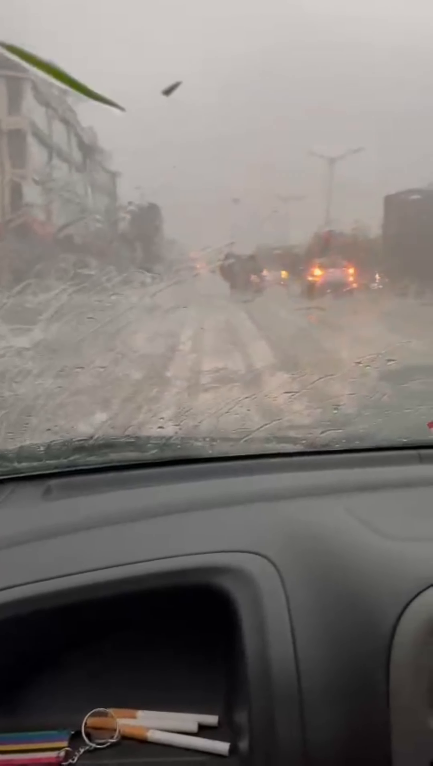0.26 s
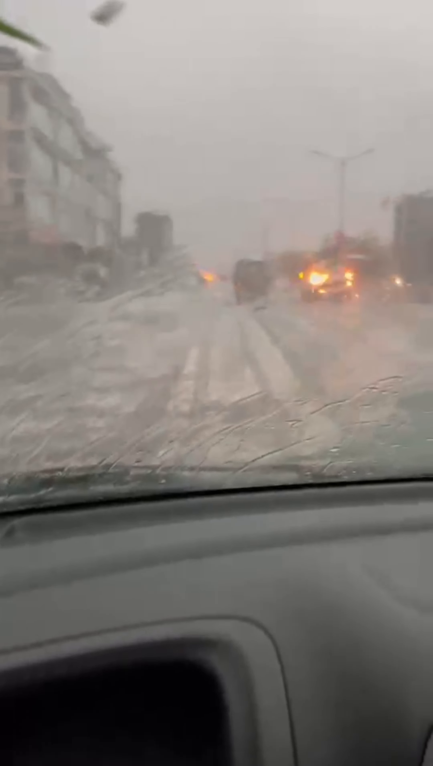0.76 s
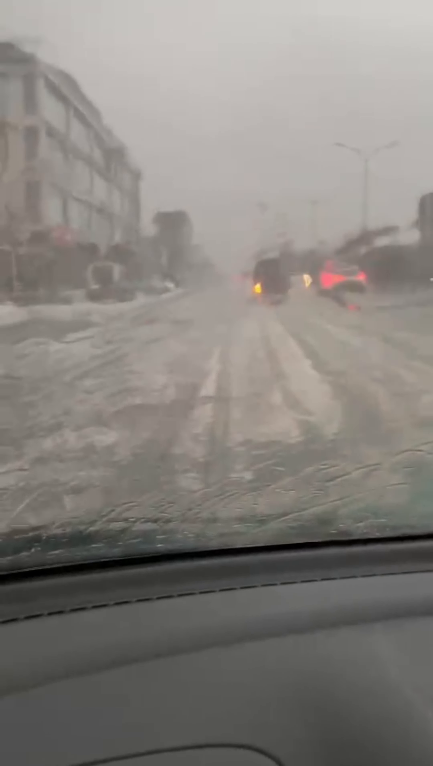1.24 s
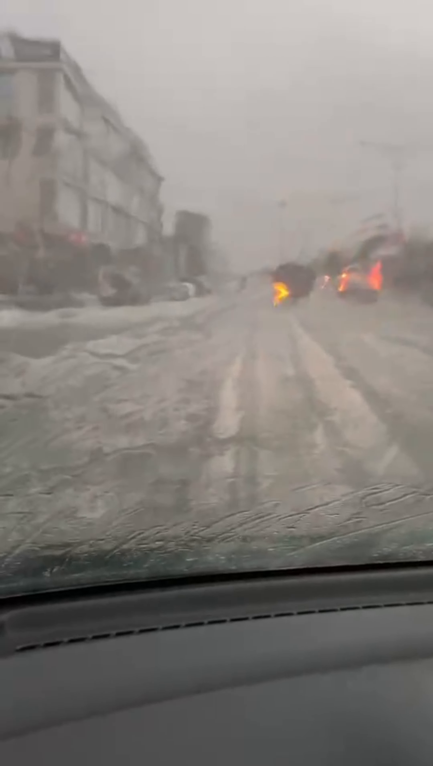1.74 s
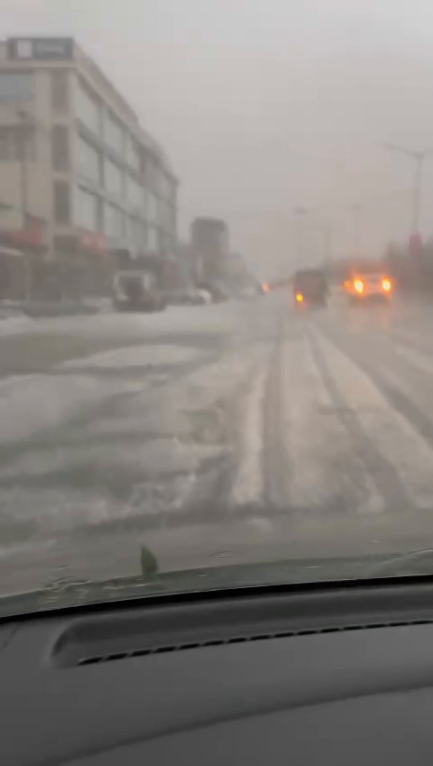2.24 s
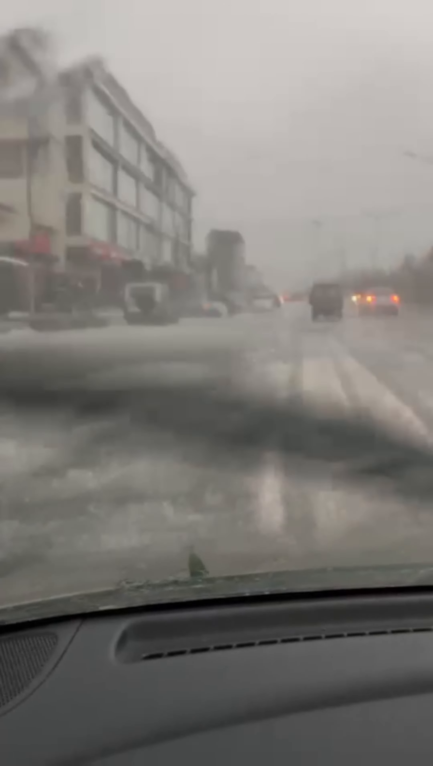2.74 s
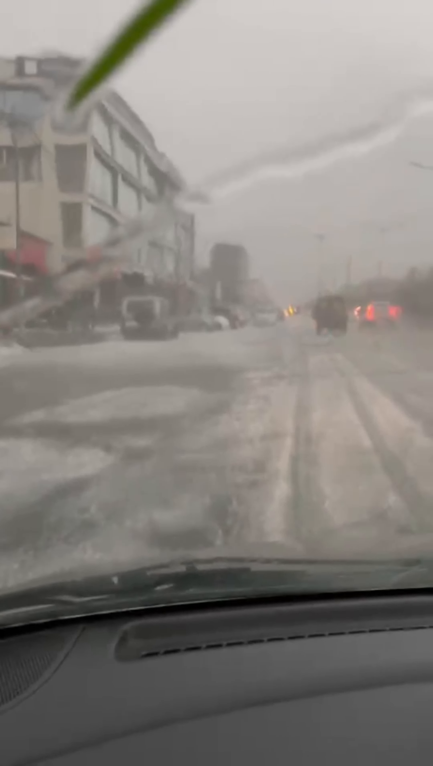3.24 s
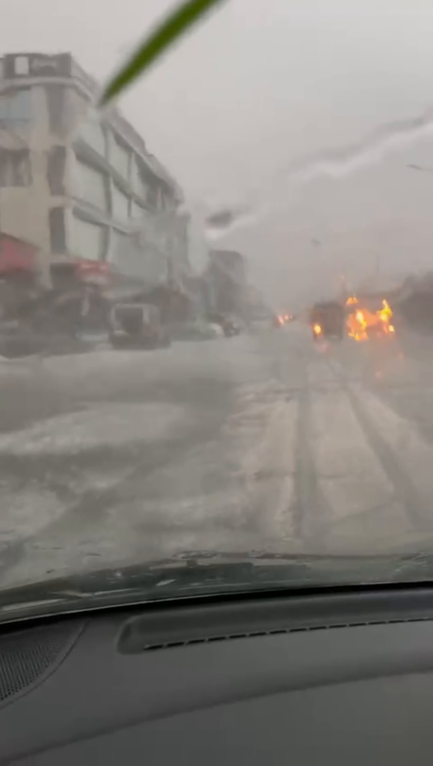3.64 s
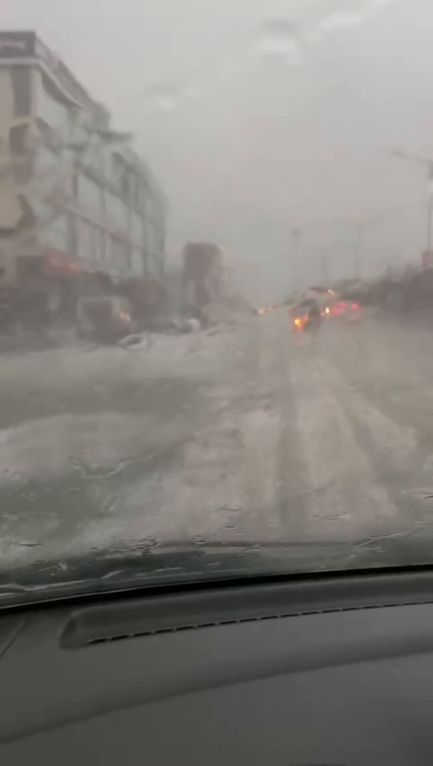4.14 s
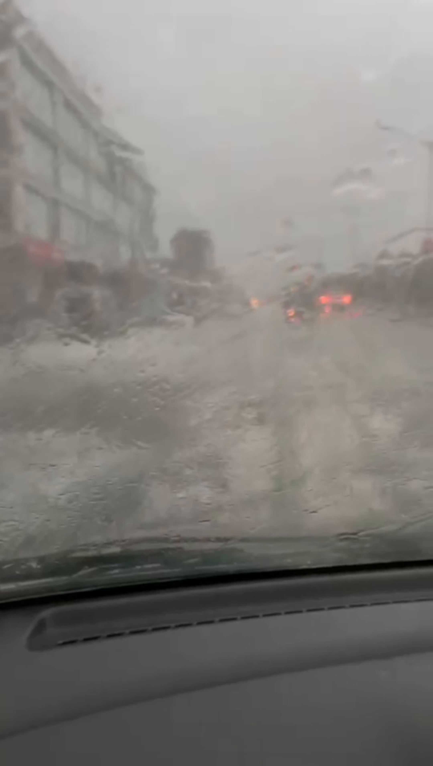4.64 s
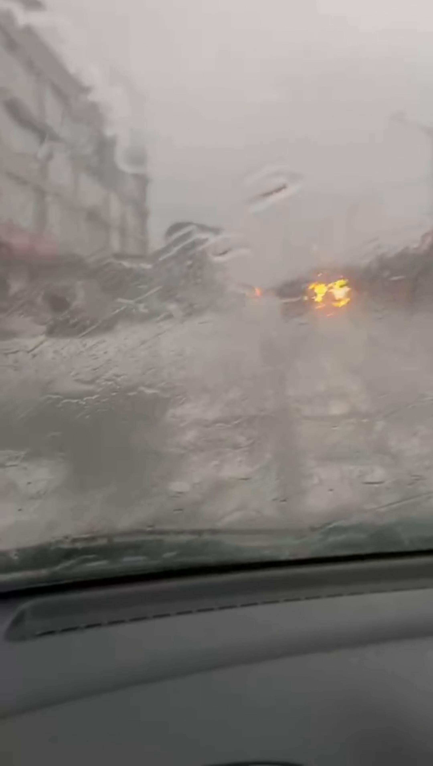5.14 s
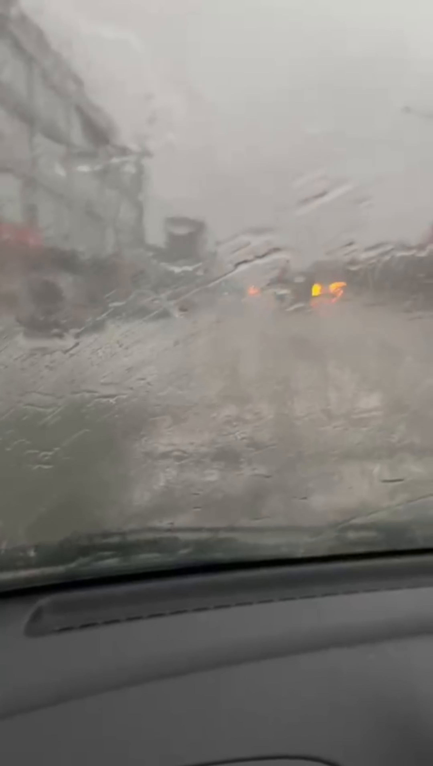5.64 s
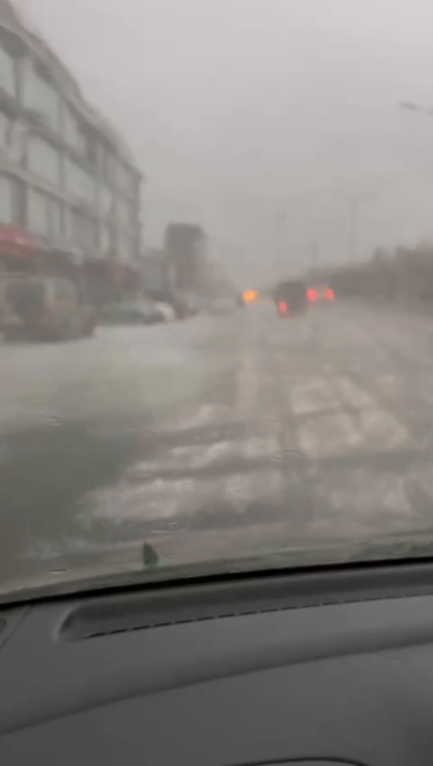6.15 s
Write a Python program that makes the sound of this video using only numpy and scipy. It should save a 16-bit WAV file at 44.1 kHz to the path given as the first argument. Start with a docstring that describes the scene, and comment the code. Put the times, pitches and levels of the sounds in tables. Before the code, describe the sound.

Dense hail rattles and hisses against glass and metal, heard from a car cabin full of low, heaving bass, thuds and hard snaps.

```python
"""Hail on a car, heard from the cabin

Hail and heavy rain drum on the roof and windscreen of a slowly rolling car.
Noise in the body's lowest modes booms, with short low swells, thuds and one low hum.
Noise shaped by random small blows makes a rattling hiss; timed larger stones crack, tick and snap out of it.
The bass is central; treble bands alternate between centred and opposed in left and right."""
import sys
import numpy as np
from scipy import signal
from scipy.fft import rfft, irfft, next_fast_len
from scipy.io import wavfile
from scipy.ndimage import uniform_filter1d, map_coordinates

SR = 44100
rng = np.random.default_rng(int(sys.argv[2]) if len(sys.argv) > 2 else 0)


def generate_wav(signal):
    """Clip the signal to [-1, 1] and save it as 16-bit WAV at the path in sys.argv[1]."""
    frames = np.transpose(np.atleast_2d(signal))
    scaled = np.clip(frames, -1, 1) * 32767
    pcm = np.round(scaled).astype(np.int16)
    wavfile.write(sys.argv[1], SR, pcm)


N = 281799


def amp(db):
    """Amplitude factor of a level in dB; amp(2 * db) is the power factor."""
    return 10 ** (np.asarray(db) / 20)


def unit(x):
    """Scale to an RMS of 1."""
    return x / np.sqrt(np.mean(x ** 2) + 1e-20)


def along(points, hz):
    """Interpolate (f/Hz, value) points on a log frequency axis."""
    f, v = np.transpose(points)
    return np.interp(np.log(hz + 1), np.log(f + 1), v)


def curves(rows):
    """One value per sample for each column after the time."""
    s, *cols = np.transpose(rows)
    t = np.arange(N) / SR
    return [np.interp(t, s, c) for c in cols]


def filtered(x, response):
    """Multiply the spectrum of x by a response of frequency in Hz."""
    m = next_fast_len(N + SR // 2)
    hz = np.fft.rfftfreq(m, 1 / SR)
    return irfft(rfft(x, m) * response(hz), m)[..., :N]


def ringing(modes, even):
    """Noise in resonances of alternating sign; even (0-1) irons out its chance swells."""
    def shell(f):
        total = 0
        for k, (centre_hz, width_hz, db) in enumerate(modes):
            damping = 1j * f * width_hz
            total = total + (-1) ** k * amp(db) * damping / (centre_hz ** 2 - f ** 2 + damping)
        return total

    x = unit(filtered(rng.standard_normal(N), shell))
    envelope = np.abs(signal.hilbert(x, next_fast_len(N))[:N])
    swell = uniform_filter1d(envelope, size=700)
    return unit(x / (swell + 0.79) ** even)


def wobble(per_s):
    """Smooth random curve: per_s random points a second, spline between."""
    return map_coordinates(rng.standard_normal(200), [np.arange(N) * per_s / SR])


def swells(rows, half_s):
    """Short tones under Gaussian envelopes (1/e half-width half_s), each at its own pitch and random phase."""
    out = np.zeros(N + SR)
    t = np.arange(-SR // 8, SR // 8) / SR
    for (s, hz, db), turn in zip(rows, rng.random(len(rows))):
        tone = np.sin(2 * np.pi * (hz * t + turn))
        out[round(s * SR):][:len(t)] += amp(db) * np.exp(-(t / half_s) ** 2) * tone
    return out[SR // 8:][:N]


def hum():
    """One low tone that swells and fades under a Gaussian envelope."""
    centre_s, pitch_hz, peak_db, half_s = 1.3, 280, -27, 0.17
    t = np.arange(N) / SR
    return amp(peak_db) * np.exp(-((t - centre_s) / half_s) ** 2) * np.sin(2 * np.pi * pitch_hz * t)


def boom():
    """The shell shakes as a whole; seats and trim swallow all above its modes, vents leak all below."""
    # mode-group levels before the cabin filter: t/s, drum level/dB, upper level/dB
    levels = [(0.0, -17.5, -20.5), (0.91, -22, -20), (1.69, -19, -17), (2.88, -17, -19), (3.22, -28.5, -19),
              (3.98, -14, -16), (4.4, -16, -19.5), (4.79, -18.5, -16.5), (5.21, -14.5, -23),
              (5.39, -18.5, -15.5), (6.0, -15, -21), (6.39, -22, -12.5)]
    # cabin and floor pan modes: f/Hz, width/Hz, relative level/dB
    sway_modes = [(45.6, 21.3, 0)]
    drum_modes = [(66.25, 9.9, 3), (80.7, 9.5, -9.5)]
    upper_modes = [(96.1, 14.9, -1.5), (122.2, 21, -0.5), (156, 46.6, -6.5), (205, 32, -10),
                   (278.8, 6.4, -13.5), (346, 20, -20.5), (391.4, 38, -21)]
    # short low swells in the boom: t/s, f/Hz, peak before cabin filter/dB
    low_swells = [(0.039, 69.6, -10), (0.828, 72.6, -6), (1.245, 72, -12), (1.406, 80, -9.5),
                  (1.706, 90, -8.5), (1.788, 90, -11), (1.887, 68, -4), (2.006, 75, -10), (2.123, 64, -17),
                  (2.236, 72, -5.7), (2.314, 95.5, -14), (2.492, 77.4, -9.5), (2.567, 100.5, -7),
                  (2.72, 92, -11.5), (3.155, 88, -10.5), (3.308, 66, -7), (3.412, 103, -11),
                  (3.58, 89, -15), (3.66, 71.5, -11), (3.881, 80, -28), (3.951, 102, -17),
                  (4.075, 77.5, -20), (4.319, 90.5, -7.5), (4.621, 68, -7.5), (4.988, 74.5, -8.5),
                  (5.102, 82, -10.5), (5.23, 82.3, -6), (5.506, 109, -9), (5.567, 94, -15),
                  (5.673, 87.5, -11.5), (5.795, 73, -5.5), (6.033, 76.4, -10.5), (6.219, 81, -6.5),
                  (6.365, 81, -13)]
    # dull thuds in the roof panel: t/s, f/Hz, peak before cabin filter/dB
    thuds = [(0.038, 192, -15.5), (0.16, 203, -15.5), (0.237, 200, -15.5), (1.16, 250, -19),
             (1.405, 266, -21), (1.582, 209, -14), (1.724, 210, -16.5), (1.848, 236, -20.5),
             (2.001, 275, -17.5), (2.216, 220, -17.5), (2.396, 229, -20), (2.512, 201, -14),
             (2.719, 200, -13), (2.999, 198, -15), (3.454, 204, -13), (3.622, 217, -20), (3.954, 219, -16),
             (4.033, 223, -16), (4.205, 238, -19.5), (4.439, 224, -19.5), (4.612, 224, -15.5),
             (4.693, 309, -15.5), (4.81, 220, -18), (5.35, 207, -19), (5.847, 219, -19), (6.188, 214, -14)]
    sway_db, drift_db, drift_per_s = -19.5, 0.34, 9
    swell_half_s, thud_half_s = 0.021, 0.012

    def drifting(db):
        return amp(db + drift_db * wobble(drift_per_s))

    def cabin(hz):
        trim = 1 / (1 + (hz / 450) ** 4)
        vents = hz ** 4 / (hz ** 4 + 24 ** 4)
        return trim * vents

    drum_db, upper_db = curves(levels)
    sway = drifting(sway_db) * ringing(sway_modes, even=1.0)
    drum = drifting(drum_db) * ringing(drum_modes, even=0.82)
    upper = drifting(upper_db) * ringing(upper_modes, even=0.24)
    bumps = swells(low_swells, swell_half_s) + swells(thuds, thud_half_s)
    return filtered(sway + drum + upper + hum() + bumps, cabin)


def small_stones(per_s, spread_db, most_db):
    """Energies of blows at random moments, sizes capped: rows for roof, glass body, glass surface."""
    draw = rng.random((6000, 4))
    at = np.cumsum(-np.log(draw[:, 0])) * SR / per_s
    keep = at < N
    size_db = np.minimum(-spread_db * np.log(draw[keep, 1:]), most_db)
    # big stones are mostly big everywhere: roof and surface follow the glass body
    size_db[:, ::2] = (size_db[:, ::2] + 3 * size_db[:, 1:2]) / 4
    return [np.bincount(at[keep].astype(int), amp(2 * db), N) for db in size_db.T]


def struck(blows, crack_s, tail_s, tail_db, rise_s=0.0029):
    """Power of blows: a brief round tap, a crack with a short soft rise, a dying tail (t60s)."""
    tap_db = -15
    t = np.arange(SR // 5) / SR
    tap = amp(2 * tap_db) * np.exp(-(2 * t / rise_s - 2) ** 2)
    rise = 1 - np.exp(-(t / rise_s) ** 2)
    decay = amp(-120 * t / crack_s) + amp(2 * tail_db - 120 * t / tail_s)
    return np.abs(signal.fftconvolve(blows, tap + rise * decay)[:N])


def mottled(patchy_db):
    """Two noises whose shared colour varies in random patches of RMS depth patchy_db."""
    z = signal.stft(rng.standard_normal((2, N)), nperseg=256)[2]
    field = rng.standard_normal(z.shape[1:])
    field = uniform_filter1d(field, size=4, axis=0)  # over frequency
    field = uniform_filter1d(field, size=6, axis=1)  # over time
    return unit(signal.istft(z * amp(patchy_db * unit(field)), nperseg=256)[1][:, :N])


def stereo(pair, colour):
    """Colour two noises and mix them as mid and side to a left-right correlation by frequency."""
    # left-right correlation by frequency: f/Hz, correlation (1 = centred, -1 = opposed)
    correlation = [(150, .9995), (280, .98), (400, .8), (800, .3), (1800, .55), (2600, -.78), (3200, -.68),
                   (4000, .08), (5200, .15), (5650, -.98), (5900, -.995), (6700, -.992), (7100, .96),
                   (8800, .975), (9400, -.997), (10900, -.997), (11500, .96)]

    def split(hz):
        turn = np.arccos(along(correlation, hz)) / 2
        return amp(along(colour, hz)) * [np.cos(turn), np.sin(turn)]

    mid, side = filtered(pair, split)
    colour_power = amp(2 * along(colour, np.linspace(0, SR / 2, num=4096)))
    return np.array([mid + side, mid - side]) / np.sqrt(np.mean(colour_power))


def pelted(colour, level_db, small, share, large, crack_s, tail_s, tail_db):
    """Coloured noise whose power is a blur of rain, a share of small stones and the large ones."""
    # small stones tap more briefly and sharply, with a weaker tail
    patter = struck(small, 0.4 * crack_s, tail_s, tail_db - 3, rise_s=0.001)
    storm = amp(2 * level_db) * (1 - share + share * patter / patter.mean())
    power = storm + struck(large, crack_s, tail_s, tail_db)
    return stereo(np.sqrt(power) * mottled(patchy_db=2), colour)


def dips():
    """Level in dB of brief dips in the bright rattle, with soft edges."""
    # dips: start/s, end/s, depth/dB
    dip_rows = [(0.391, 0.438, -9), (0.551, 0.562, -11), (0.65, 0.673, -6), (0.922, 0.945, -4),
                (1.772, 1.8, -4.5), (1.922, 1.94, -6), (2.4, 2.435, -2.5), (2.595, 2.612, -6),
                (3.704, 3.777, -3.5), (3.878, 3.919, -9.5), (4.01, 4.063, -5), (5.375, 5.404, -5)]
    fall_s, return_s = 0.0071, 0.003
    t = np.arange(N) / SR
    return sum(db / 2 * (np.tanh((t - a) / fall_s) - np.tanh((t - b) / return_s)) for a, b, db in dip_rows)


def snaps(blows):
    """Short bright noise snaps, the same in left and right."""
    # snap colour: f/Hz, gain/dB
    snap_colour = [(1500, -27), (3000, -1), (6200, 3), (9000, -2), (10500, -4), (12000, -12), (13200, -45)]
    power = struck(blows, crack_s=0.003, tail_s=0.03, tail_db=-15, rise_s=0.0014)
    return filtered(np.sqrt(power) * rng.standard_normal(N), lambda hz: amp(along(snap_colour, hz)))


def hail():
    """The same stones knock the roof dully, crack in the glass and tick on its surface."""
    # storm strength: t/s, roof drumming level/dB, glass rattle level before dips/dB
    storm = [(0.0, -30.5, -36), (0.3, -35, -39), (0.65, -34, -39), (1.07, -31.5, -41.5), (1.85, -31.5, -40),
             (2.4, -31, -39.5), (2.9, -32.5, -39), (3.52, -30, -35.5), (3.72, -31.5, -39.5),
             (4.05, -31.5, -40), (4.5, -31, -38), (4.9, -31.5, -38.5), (5.46, -31.5, -39.5),
             (6.39, -31.5, -37.5)]
    # largest stones, blow strengths: t/s, crack/dB, tick/dB, snap before its colour/dB
    stones = [(0.17, -19.5, -29, -26), (0.196, -23, -23, -36), (0.44, -24.5, -30.5, -34),
              (0.494, -24, -24, -50), (0.511, -21.5, -29, -50), (0.568, -25.5, -29, -27),
              (0.7057, -20, -29, -52), (0.7806, -21.5, -29.5, -47), (0.828, -19, -29.5, -34),
              (0.862, -29, -26, -34), (0.8804, -37, -29, -34), (0.8946, -17, -26, -40),
              (0.964, -16, -27.5, -38), (1.022, -21, -27, -48), (1.061, -18.5, -32, -50),
              (1.266, -22.5, -35, -50), (1.3412, -19.5, -33, -52), (1.4182, -23.5, -30, -37),
              (1.352, -28, -36, -50), (1.461, -26, -29, -34), (1.502, -25.5, -36, -50),
              (1.533, -16, -24.5, -30), (1.557, -21.5, -30, -50), (1.588, -19.5, -38, -52),
              (1.799, -27.5, -28, -27), (1.953, -21, -52, -44), (2.0782, -21, -36, -49),
              (2.1549, -25, -28, -29), (2.188, -21, -31, -48), (2.3168, -21.5, -43, -39),
              (2.379, -18.5, -31, -46), (2.5, -17.5, -27, -44), (2.529, -20, -39, -48),
              (2.566, -22.5, -34, -38), (2.662, -23.5, -27, -22), (2.724, -22, -34, -42),
              (2.869, -23.5, -30.5, -53), (2.942, -19, -26, -35), (2.989, -21, -42, -50),
              (3.078, -19.5, -36, -50), (3.108, -25, -38, -48), (3.235, -29, -38, -50),
              (3.279, -32, -34.5, -43), (3.291, -30, -29, -52), (3.445, -21.5, -31, -50),
              (3.603, -24, -30, -50), (3.668, -17.5, -33, -50), (3.68, -22.5, -28.5, -47),
              (3.7837, -24.5, -35, -27), (3.8557, -23.5, -31, -48), (3.917, -27.5, -34, -36),
              (3.956, -22, -27, -23), (3.9786, -19.5, -33, -46), (3.988, -21, -33, -47),
              (4.419, -21.5, -34, -52), (4.439, -23, -34, -50), (4.491, -22, -33, -44),
              (4.543, -23.5, -34, -50), (4.638, -30.5, -33, -34), (4.65, -20, -26, -50),
              (4.844, -26, -40, -57), (4.903, -28.5, -29.5, -57), (4.914, -25.5, -30, -50),
              (4.935, -27.5, -32.5, -52), (5.024, -20.5, -32, -53), (5.043, -22.5, -34, -49),
              (5.15, -24, -23.5, -38), (5.159, -18, -24.5, -30), (5.207, -22, -29, -48),
              (5.4437, -14.5, -33, -33), (5.519, -31.5, -33, -32), (5.694, -24, -31.5, -44),
              (5.721, -20.5, -36, -54), (5.772, -21, -30, -37), (5.781, -16.5, -25, -28),
              (5.8247, -18.5, -46, -52), (5.974, -16.5, -34, -55), (5.99, -23, -32, -52),
              (6.007, -22, -31, -50), (6.0607, -26, -27.5, -40), (6.129, -29.5, -35, -50),
              (6.239, -19.5, -29, -40), (6.3086, -22.5, -35, -49), (6.328, -17, -24, -50)]
    # noise colours: f/Hz, relative spectral density/dB
    roof_colour = [(150, -30), (260, -3), (400, -4), (560, -9), (800, -13), (1200, -15), (1800, -21),
                   (2600, -38), (4000, -90)]
    glass_colour = [(600, -40), (1300, -8), (2000, -2), (3000, 0), (4000, -4), (5200, -8), (6200, -20),
                    (8000, -70)]
    tick_colour = [(3000, -40), (5000, -6), (6200, 0), (7200, -3), (9000, -6), (10200, -5), (11200, -11),
                   (11700, -17), (12300, -60)]
    knock_db, patter_db = -11, -13  # knock re crack; small ticks re rattle

    drum_db, rattle_db = curves(storm)
    on_roof, in_glass, on_glass = small_stones(per_s=400, spread_db=5.5, most_db=11.5)
    s, crack_db, tick_db, snap_db = np.transpose(stones)

    def blows(db):
        return np.bincount((s * SR).astype(int), amp(2 * db), N)

    roof = pelted(roof_colour, drum_db, on_roof, share=0.58, large=blows(crack_db + knock_db),
                  crack_s=0.032, tail_s=0.41, tail_db=-4.0)
    glass = pelted(glass_colour, rattle_db, in_glass, share=0.81, large=blows(crack_db),
                   crack_s=0.011, tail_s=0.16, tail_db=-15.5)
    ticks = pelted(tick_colour, rattle_db + patter_db, on_glass, share=0.84, large=blows(tick_db),
                   crack_s=0.0081, tail_s=0.18, tail_db=-20)
    return roof + amp(dips()) * (glass + ticks) + snaps(blows(snap_db))


def scene():
    """Central shell boom under the hail."""
    return boom() + hail()


def record(dry):
    """Left and right differ a little in colour above the bass; peaks saturate softly; a band limit follows."""
    # left-right imbalance, used above 300 Hz: f/Hz, left re right/dB
    lean = [(330, -1.5), (470, -4.5), (660, 1.5), (1100, 2.5), (1900, 0.5), (4400, -1), (5400, 0)]
    ceiling, knee, top_hz = 0.95, 4.5, 13500
    x = filtered(dry, lambda hz: amp(along(lean, hz) * (hz > 300) * [[0.5], [-0.5]]))
    x = x / (1 + np.abs(x / ceiling) ** knee) ** (1 / knee)
    return filtered(x, lambda hz: hz < top_hz)


dry = scene()
out = record(dry)
generate_wav(out)
```